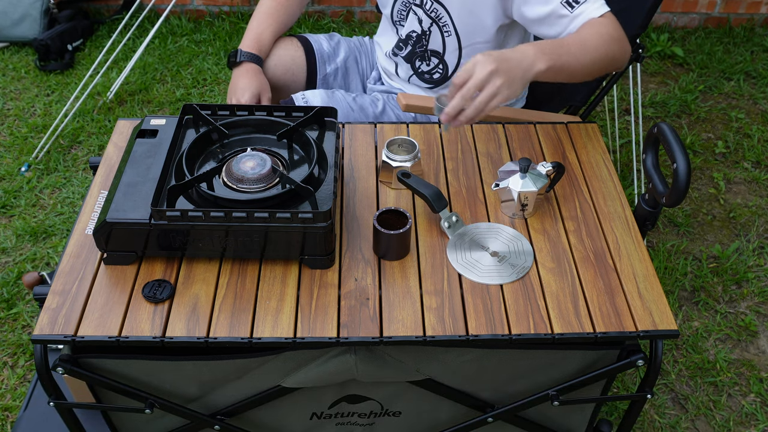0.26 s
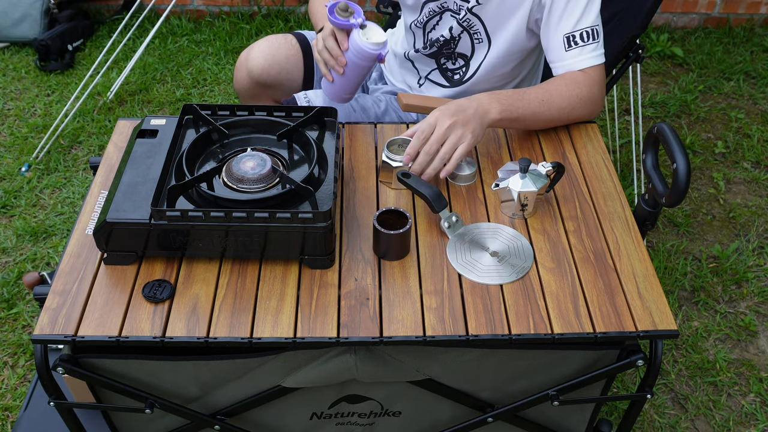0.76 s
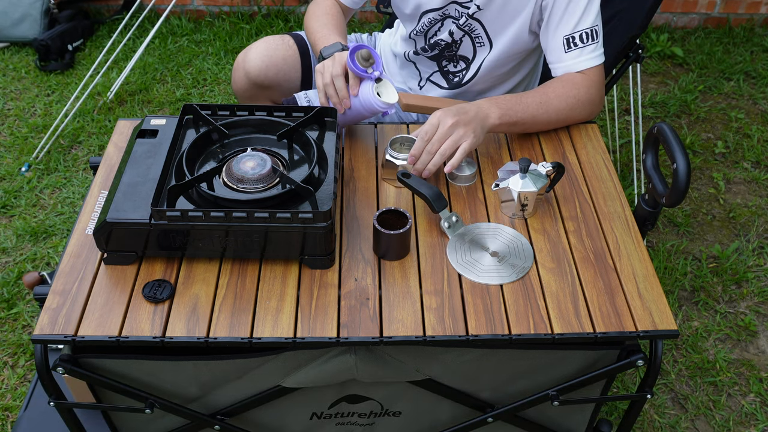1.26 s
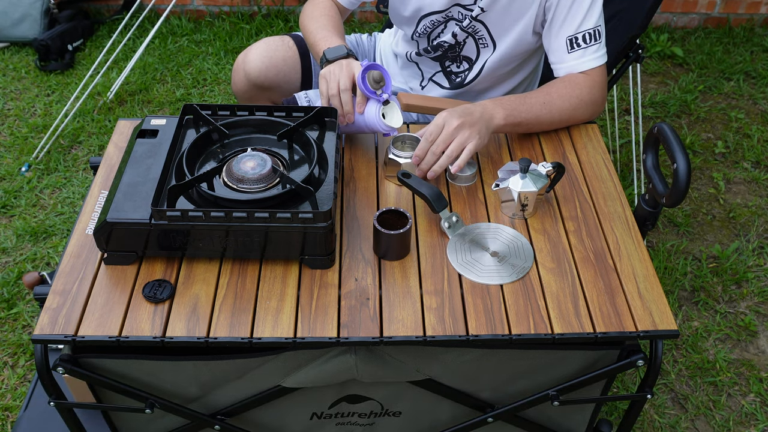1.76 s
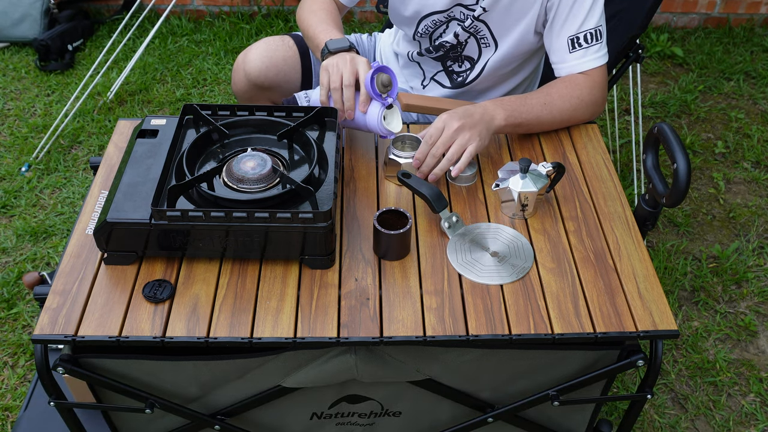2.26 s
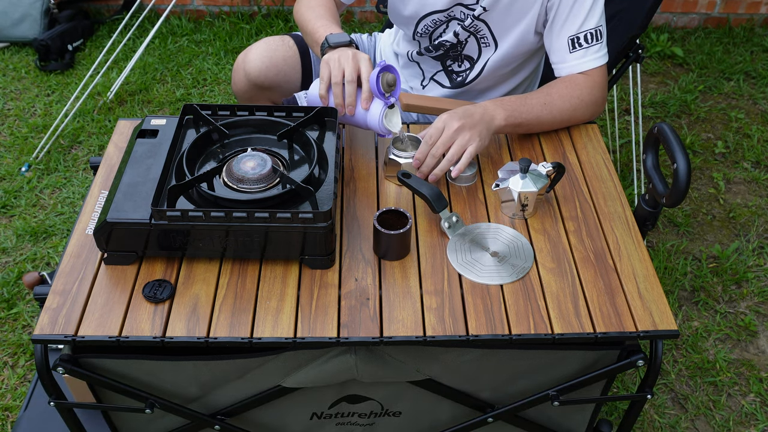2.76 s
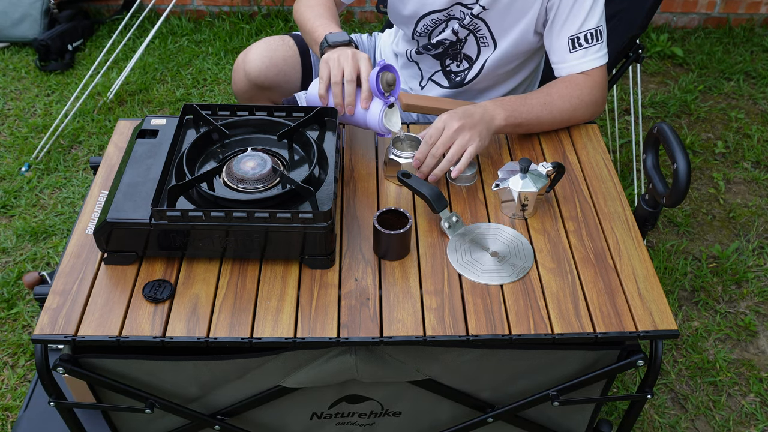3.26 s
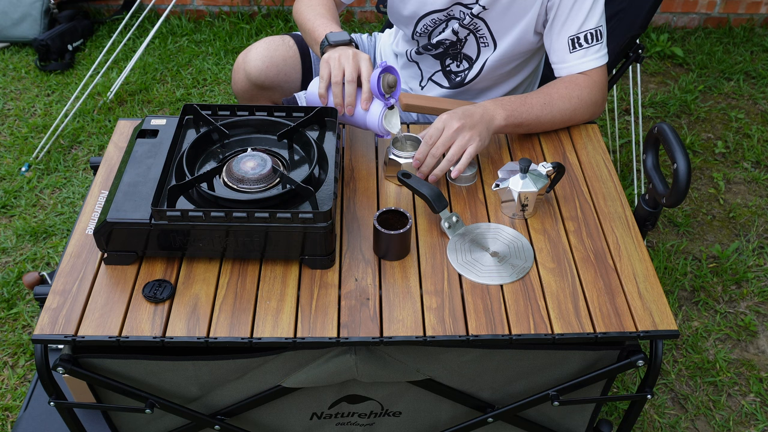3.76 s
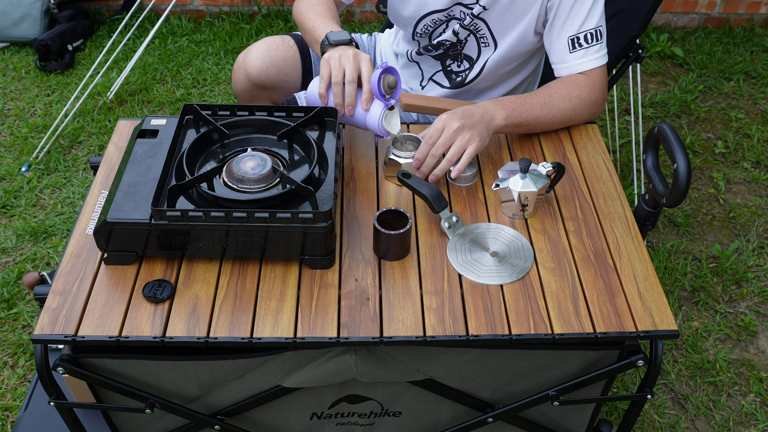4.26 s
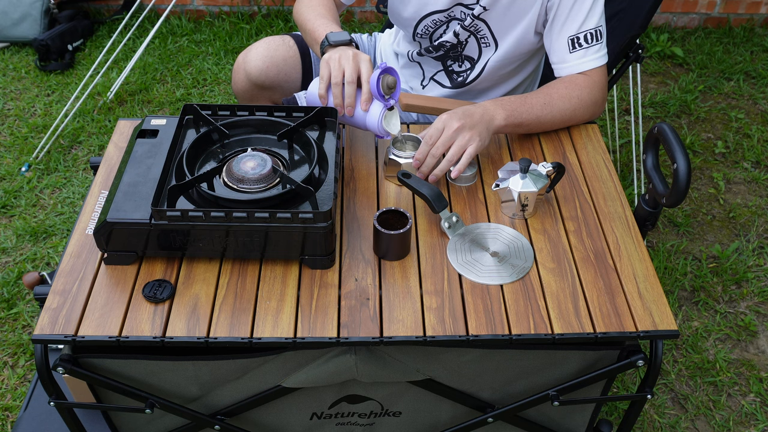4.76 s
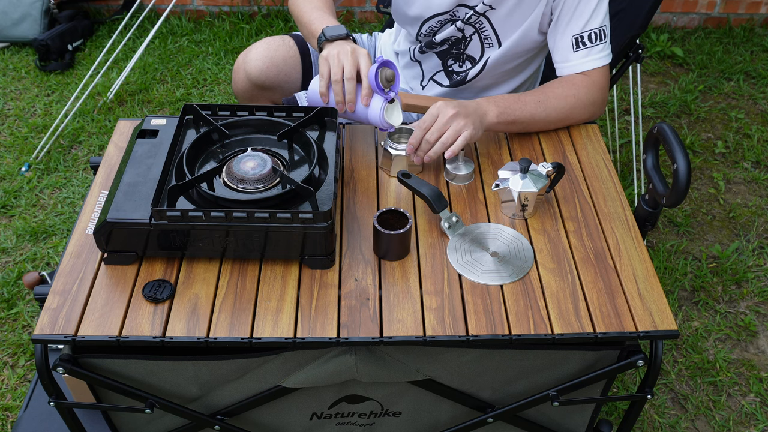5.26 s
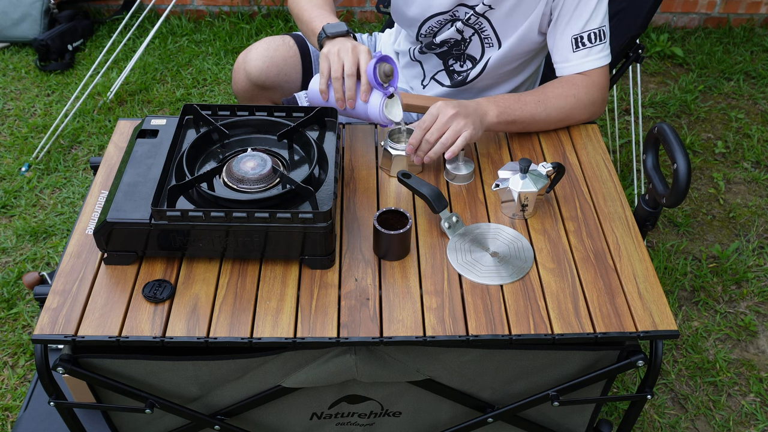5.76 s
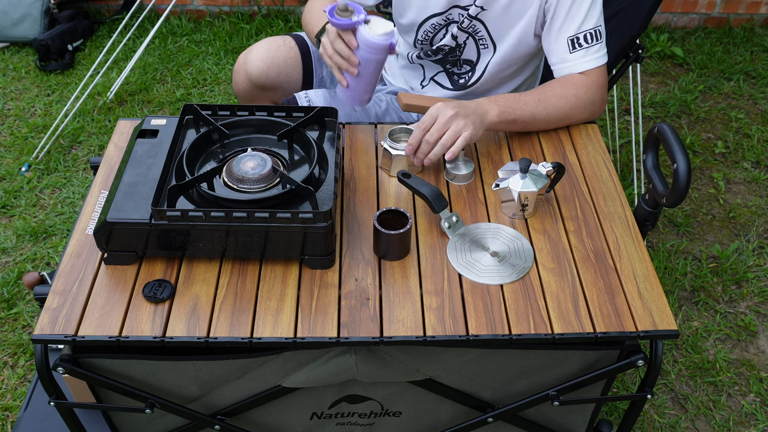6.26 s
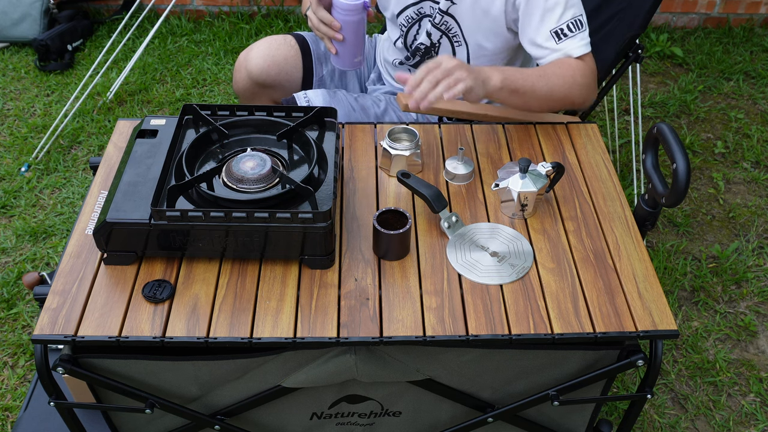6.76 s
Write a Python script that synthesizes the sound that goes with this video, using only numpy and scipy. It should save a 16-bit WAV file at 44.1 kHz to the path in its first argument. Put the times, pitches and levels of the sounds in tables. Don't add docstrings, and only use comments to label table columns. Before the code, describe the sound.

A metal coffee pot part clinks down and slides on a slatted wood table, then a bottle jolts and scrapes hollowly away. Small taps and rubs lead to one short cat mew, slightly left. Water follows in ticking drips and bubbling gulps, strongest midway, thinning out, then a short second splash and final faint handling. Pulsing cicadas, rustling leaves and far traffic surround it in wide stereo; the table is near and central.

```python
import sys
import numpy as np
from scipy import signal
from scipy.fft import rfft, irfft
from scipy.io import wavfile
from scipy.ndimage import uniform_filter1d

SR = 44100
rng = np.random.default_rng(int(sys.argv[2]) if len(sys.argv) > 2 else 0)


def persist_wave(psi):
    counts = np.round(np.clip(psi, -1, 1) * 32767).astype(np.int16)
    wavfile.write(sys.argv[1], SR, np.atleast_2d(counts).T)


def voltage_ratio(decibels):
    exponent = np.asarray(decibels, float) / 20
    return 10 ** exponent


N = 309134


def rms_one(x):
    return x / np.sqrt(np.mean(x ** 2) + 1e-20)


def in_time(rows, outside=None):
    s, *columns = np.transpose(rows)
    return [np.interp(np.arange(N) / SR, s, c, outside, outside) for c in columns]


def drift(rate):
    r = np.exp(-80 * np.pi * rate / SR)
    slow = signal.lfilter([1], [1, -2 * r, r * r], rng.standard_normal(N // 40 + 2002))[2000:]
    return np.interp(np.arange(N) / 40, np.arange(len(slow)), rms_one(slow))


def band(x, low_hz, high_hz, order=2):
    sos = signal.butter(order, [low_hz, high_hz], "band", fs=SR, output="sos")
    return signal.sosfilt(sos, x + 1e-18)


def resonate(x, hz, width):
    r = np.exp(-np.pi * width / SR)
    zeros = np.array([1, 0, -1]) * (1 - r * r) / 2
    return signal.lfilter(zeros, [1, -2 * r * np.cos(2 * np.pi * hz / SR), r * r], x)


def resonate_twice(x, hz, width):
    return resonate(resonate(x, hz, width), hz, width)


def place(x, pan_db):
    return x * voltage_ratio([[pan_db / 2], [-pan_db / 2]])


def add(out, s, sound):
    i = round(s * SR)
    out[i:i + len(sound)] += sound[:N - i]


def decay(t, t60):
    return voltage_ratio(-60 * t / t60)


def ping(hz, t60, rise=0., soft_s=0.000092):
    t = np.arange(int(1.2 * t60 * SR) + 40) / SR
    sine = np.sin(2 * np.pi * hz * t * (1 + rise * t / t60))
    return sine * decay(t, t60) * (1 - np.exp(-t / soft_s))


def grains(per_s, spread_db):
    sizes = voltage_ratio(spread_db * np.minimum(rng.exponential(1, N), 4)) * rng.choice([-1, 1], N)
    return sizes * (rng.random(N) < per_s / SR)


def lawn(x, echo_db):
    out, dull = np.zeros((2, N)), band(x, 200, 11000, order=1)
    lags = np.sort(rng.uniform(0.002993, .07, 14) * SR).astype(int)
    for k, lag in enumerate(lags):
        out[k % 2, lag:] += dull[:-lag] * voltage_ratio(echo_db - 250 * lag / SR) * (-1) ** (k // 2)
    return out


def gate(start, length, edge):
    end = start + length
    corners = [start - edge, start + edge, end - edge, end + edge]
    return np.sin(np.pi / 2 * np.interp(np.arange(N) / SR, corners, [0, 1, 1, 0])) ** 2


# [f/Hz, density/dB per Hz]
AIR_SPECTRUM = [(25, -30), (50, -6), (80, -4), (200, 0.5), (400, -8.5), (700, -15), (1500, -11.5),
                (3000, -16), (5400, -7.5), (6000, -8), (8400, -17), (9500, -27), (14000, -33.5),
                (15500, -31.5)]
# [f/Hz, width/Hz, level/dB]
DARK_SPOTS = [(3550, 300, -3.5), (5790, 430, -22), (8600, 350, -10)]
# [f/Hz, likeness 0-1]
LIKENESS = [(25, .99), (125, 0.95), (400, 0.77), (1000, 0.51), (3000, 0.51), (9000, 0.38), (15000, 0.044)]
# [t/s, relative level/dB]
BREEZE = [(0, 2.5), (.9, 1), (1.9, 1), (2.9, 1.5), (3.6, 1.1), (4.6, 3), (5.25, 0.5), (5.7, 4), (6.2, -0.5),
          (6.5, 0), (7.01, 2)]
# [f/Hz, rms level/dB]
HUM = [(120, -84), (240, -66.5)]


def air():
    hz = np.maximum(np.fft.rfftfreq(N, 1 / SR), 10)

    def read(rows):
        at, value = np.transpose(rows)
        return np.interp(np.log(hz), np.log(at), value)

    alike = read(LIKENESS)
    dips_db = sum(db * np.exp(-((hz - at) / w) ** 2) for at, w, db in DARK_SPOTS)
    mid, side = rfft(rng.standard_normal((2, N))) * voltage_ratio(read(AIR_SPECTRUM) + dips_db)
    mid, side = mid * np.sqrt(1 + alike), side * np.sqrt(1 - alike)
    noise = rms_one(irfft(np.array([mid + side, mid - side]), N)) * voltage_ratio(-56)
    rustle = band(noise, 570, 14400, order=1)
    noise = noise + rustle * (voltage_ratio(in_time(BREEZE)[0] + 0.45 * drift(6.8)) - 1)
    t = np.arange(N) / SR
    hum = sum(np.sqrt(2) * voltage_ratio(db + 2.2 * drift(0.63)) * np.sin(2 * np.pi * hz * t) for hz, db in HUM)
    return noise + hum


def cicada(pulse_hz, modes, depth, sharp, alike, pan_db, edges):
    phase = np.cumsum(pulse_hz * (1 + 0.025 * drift(8))) / SR
    burst = 1 - depth + depth * np.exp(-sharp * (phase % 1))
    mid, side = rng.standard_normal((2, N))
    direct = burst * mid * np.sqrt(1 + alike)
    scattered = np.roll(burst, 150) * side * np.sqrt(1 - alike)
    drive = direct + scattered * [[1], [-1]]
    body = 0
    for k, (hz, width, db) in enumerate(modes):
        body = body + voltage_ratio(db) * (-1) ** k * resonate_twice(drive, hz, 1.06 * width)
    return place(rms_one(band(body, *edges, order=5)), pan_db)


# [t/s, level/dB]
CHORUS = [(0, -56), (3.5, -56.5), (7.01, -55.5)]
# [f/Hz, width/Hz, level/dB]
CHORUS_MODES = [(6330, 1900, -9.5), (7276, 510, 4), (7770, 210, -11)]


def chorus():
    song = cicada(80.6, CHORUS_MODES, depth=0.66, sharp=3.2, alike=0.08, pan_db=-5.5, edges=(6200, 8250))
    return voltage_ratio(in_time(CHORUS)[0]) * song


THROB_HZ = 57.3
# [t/s, level/dB]
DRONE = [(0.0, -46), (1.31, -47), (2.46, -46), (4.55, -46.5), (5.04, -44.5), (5.9, -48.5), (7.01, -47)]
# [f/Hz, width/Hz, level/dB]
DRONE_MODES = [(4224, 500, -4.5), (4662, 437, 3), (5033, 326, 2), (5138, 644, -6.5)]


def drone():
    song = cicada(THROB_HZ, DRONE_MODES, depth=0.48, sharp=2.8, alike=0.63, pan_db=-3, edges=(3950, 5420))
    return voltage_ratio(in_time(DRONE)[0] + 0.5 + 1.3 * drift(5)) * song


# [first pull t/s, peak level/dB, length/s]
THROBS = [(0.05, -41, .11), (0.285, -42.5, 0.11), (0.5117, -39.5, 0.15), (0.7235, -41.5, .11),
          (0.9374, -41.5, 0.096), (1.1535, -41.5, 0.1), (1.364, -42, 0.11), (1.594, -41.5, 0.089),
          (1.8205, -42, 0.097), (2.0113, -42.5, 0.13), (2.229, -39, 0.12), (2.4365, -40, .11),
          (3.195, -57, 0.062), (3.472, -45, 0.21), (3.75, -42, 0.15), (4.005, -43, 0.12),
          (4.232, -42, 0.077), (4.4464, -42.5, .11), (4.657, -41, 0.12), (4.8705, -41.5, 0.13),
          (5.253, -40.5, 0.1), (5.4743, -40, .11), (5.694, -41, 0.12), (6.7458, -41.5, 0.19)]


def near_cicada():
    lead_s = .006
    t, starts = np.arange(N) / SR, np.transpose(THROBS)[0] - lead_s
    which = np.maximum(np.searchsorted(starts, t) - 1, 0)
    phase = np.abs(t - starts[which]) * THROB_HZ
    pull, count = phase % 1, phase.astype(int) + 128 * which
    chance = rng.standard_normal((count.max() + 1, 2))[count]
    sweep_hz = np.interp(pull, [0, .55], [5000, 3890]) * (1 + 0.022 * chance[:, 0])
    shape = np.interp(pull, [0, .15, .45, .7], [0.46, 0.36, 1, 0.1]) * voltage_ratio(1.3 * chance[:, 1])
    rough = 1 + 0.31 * rms_one(band(rng.standard_normal(N), 60, 360))
    song = rms_one(shape * rough * np.sin(2 * np.pi * np.cumsum(sweep_hz) / SR))
    song = band(song, 3760, 5400, order=4)
    song = song * sum(voltage_ratio(db - 6.5) * gate(s - lead_s, length, edge=0.01) for s, db, length in THROBS)
    return place(song, -3.5) + lawn(song, echo_db=-9.0)


# [t/s, f/Hz, level/dB, mouth shape 1-0: 1 pinched, 0.7 wide, 0.4 half open, 0 closing]
MEW = [
    (2.065, 436, -56, 1),
    (2.105, 450, -50, 1),
    (2.15, 453, -43.5, 0.87),
    (2.23, 462.6, -37.5, 0.71),
    (2.32, 466.7, -37, 0.63),
    (2.47, 452.5, -37, 0.42),
    (2.57, 439.8, -41.5, 0.3),
    (2.65, 399.5, -52, 0.09),
    (2.74, 348.5, -61, 0.02),
]
# [multiple, pinched level/dB, wide level/dB, half-open level/dB, closing level/dB]
MEW_MOUTHS = [(1, -24, -33, -31, 2.5), (2, -19, -32.5, -19.5, -12), (3, -16, -13, -13.5, -8),
              (4, -9, -4, -1, -4.5), (5, -12.5, -5, -11, -17), (6, -27, -20, -32, -31),
              (7, -9, -31, -21, -16), (8, -6, -10, -9.5, -18), (9, -2, -11, -21, -22),
              (10, -9, -21, -22, -34), (11, -22, -18, -17, -33), (12, -26, -15, -18.5, -42),
              (13, -25, -16, -39, -50)]


def mew():
    pitch_hz, _, mouth = in_time(MEW)
    level = voltage_ratio(in_time(MEW, -120)[1])
    steady_hz = uniform_filter1d(pitch_hz, size=1500)
    phase = 2 * np.pi * np.cumsum(steady_hz * (1 + 0.002 * drift(59))) / SR
    voice = 0
    for k, *mouths_db in MEW_MOUTHS:
        db = np.interp(mouth, [0, .4, .7, 1], mouths_db[::-1])
        wobble_db = 2.2 * np.sqrt(k / 4) * drift(14.0)
        voice = voice + voltage_ratio(db + wobble_db) * np.cos(round(k) * phase + rng.uniform(0, np.pi))
    low_breath = band(rng.standard_normal(N), 1750, 2340, order=3)
    high_breath = band(rng.standard_normal(N), 2740, 5200, order=4)
    breath = voltage_ratio(-15.5) * rms_one(low_breath + 0.66 * high_breath)
    return level * (1.35 * voice + breath)


# [start t/s, length/s, level/dB, centre f/Hz]
SLIDES = [(0, 0.061, -53, 534), (0, 0.012, -44, 1830), (.072, 0.11, -53, 1440), (.565, 0.038, -47, 950),
          (.583, 0.016, -42, 1290), (.64, 0.086, -44, 2310), (.684, 0.0051, -37.5, 4100),
          (.715, 0.052, -51, 1290), (1.108, 0.068, -51, 1570), (1.15, 0.077, -47.5, 1360),
          (1.1, 0.48, -57, 470), (1.2, 0.27, -52.5, 1160), (1.63, 0.14, -53, 1620),
          (1.75, 0.63, -61.5, 1420), (2.7, 0.16, -55, 1040), (4.05, 0.17, -54.5, 520),
          (3.225, 0.046, -61, 1060), (5.365, 0.067, -48.5, 367), (5.37, 0.16, -61.5, 2330),
          (5.368, .03, -58, 1500), (5.641, .006, -56, 1200), (.73, 0.18, -59, 730),
          (6.75, 0.15, -58, 328.6)]
# [start t/s, length/s, level/dB, centre f/Hz]
CHAFES = [(.43, 0.087, -60.5, 1940), (1.96, 0.19, -56, 3200), (1.165, 0.042, -48.5, 1420),
          (1.3, 0.026, -55, 1500), (1.245, 0.032, -49.5, 1050), (2.66, 0.093, -52, 1730),
          (5.38, 0.17, -57.5, 1120), (5.4, 0.18, -58.5, 500), (6.38, 0.14, -58.5, 2930),
          (6.66, 0.074, -53.5, 3120), (6.7, 0.2, -61.5, 2600)]
# [start t/s, length/s, level/dB, centre f/Hz]
RUSHES = [(3.45, 0.95, -74, 9300), (4.005, 0.025, -50.5, 420), (4.03, 0.1, -47, 1880),
          (4.07, 0.14, -38.5, 1540), (4.16, 0.2, -48.5, 2190), (4.2, 0.17, -48.5, 1590),
          (4.45, 0.062, -52, 3230), (4.48, 0.016, -55, 2390), (4.9, 0.17, -54.5, 1730),
          (4.95, 0.13, -57, 2240), (5.13, 0.074, -59, 1970)]
# [f/Hz, width/Hz, level/dB, length/s]
BUMP = [(520, 300, -45, 0.16), (830, 210, -47, 0.014), (1180, 630, -34, 0.056), (1870, 1400, -34.5, 0.037),
        (4540, 3700, -37.5, 0.021), (11000, 4000, -70, .018)]


def rubbing():
    out, slips = np.zeros(N), grains(4000, spread_db=3.0) * voltage_ratio(0.3 * drift(59))
    strokes = []
    for rows, share in [(SLIDES, 0.67), (CHAFES, 0.22), (RUSHES, 0.21)]:
        strokes += [(*row, share * row[3]) for row in rows]
    strokes += [(0.597, length, db, hz, width) for hz, width, db, length in BUMP]
    for k, (s, length, db, hz, width) in enumerate(strokes):
        i, n = int(s * SR), int(length * SR) + 500
        excitation = np.roll(slips, 997 * k)[i:i + n]
        stroke = rms_one(band(excitation, max(hz - width / 2, 100), hz + width / 2))
        swell = np.interp(np.arange(n), [0, 0.22 * n, 0.55 * n, n], [0.81, 1.0, 0.92, 0.18])
        add(out, s, voltage_ratio(db) * resonate(stroke, hz, 2.0 * width) * swell)
    return out


# [t/s, hollow level/dB, slats level/dB]
DRAG = [
    (.562, -62, -70),
    (.578, -52, -60),
    (.596, -49, -34),
    (.604, -28.5, -33),
    (.636, -36, -39),
    (.655, -28.5, -39),
    (.68, -33, -43),
    (.712, -38, -49),
    (.72, -58, -50),
]
# [f/Hz, width/Hz, level/dB]
SLATS = [(827, 84, -1), (1480, 55, 0), (1730, 90, -3), (2010, 61, 0), (2320, 51, -5)]


def drag():
    hollow_db, slats_db = in_time(DRAG, -150)
    slips = grains(3000, spread_db=3.0)
    hollow = rms_one(resonate_twice(slips, 1120, 1.5 * 67))
    slats = 0
    for k, (hz, width, db) in enumerate(SLATS, 1):
        slats = slats + voltage_ratio(db) * rms_one(resonate(np.roll(slips, 997 * k), hz, width))
    return voltage_ratio(hollow_db) * hollow + voltage_ratio(slats_db) * rms_one(slats)


# [t/s, peak level/dB, thud relative level/dB, main ring f/Hz]
KNOCKS = [(.006, -36.5, -8, 2100), (0.517, -45, 6.5, 1190), (.602, -22.5, -35, 1500),
          (.6855, -20.5, -19, 1637), (.686, -26.5, -32, 950), (0.768, -45, 8, 696), (1.179, -57, -20, 1480),
          (1.235, -34, 1, 1120), (1.355, -41, -5, 1670), (1.637, -42, -27, 1600), (1.678, -38, -31, 1770),
          (1.764, -42.5, -27, 1440), (1.861, -46.5, -17, 1320), (1.984, -46, -10, 1437),
          (2.738, -41, -22, 1120), (5.191, -43, -18, 1772), (5.37, -46, 6, 810), (5.533, -47, -10, 1650),
          (6.585, -43, -2, 1180)]
# [f/Hz, level/dB, t60/s]
POT = [(2530, -28, 3.8), (3040, -13, 0.59), (3934, 10, 0.16), (4015, 3.5, 0.43), (4900, -16, 1.3),
       (5030, -9, 0.09), (7250, -27, 0.47), (10000, -11.5, 0.26)]


def knocks():
    out, t = np.zeros(N), np.arange(int(.08 * SR)) / SR
    for s, db, thud_db, hz in KNOCKS:
        hiss = rng.standard_normal(len(t))
        add(out, s, voltage_ratio(db - 1.5) * ping(hz, 0.042, soft_s=0.00027))
        add(out, s, voltage_ratio(db - 8.0) * rms_one(band(hiss, 746, 1960, order=3)) * decay(t, 0.12))
        add(out, s, voltage_ratio(db + thud_db) * ping(233, 0.042, soft_s=0.001))
        add(out, s, voltage_ratio(db - 35) * rms_one(band(hiss, 3700, 6000)) * decay(t, 0.013))
    for hz, db, t60 in POT:
        add(out, 0, voltage_ratio(KNOCKS[0][1] + db - 7.5) * ping(hz, t60))
    return out


# [start t/s, length/s, level/dB, start f/Hz, end f/Hz]
WHISTLES = [(.003, 0.012, -49, 2080, 2030), (.003, 0.013, -43, 3200, 3260), (.003, 0.013, -45, 790, 790),
            (.044, 0.0084, -51, 2320, 2210), (1.369, 0.03, -61, 2450, 2450),
            (3.016, 0.026, -59, 3300, 3370), (3.117, 0.045, -64, 3080, 2430),
            (3.201, 0.073, -55.5, 1317, 963), (4.394, .022, -57, 2320, 2300),
            (4.699, .016, -51, 2680, 1900), (4.959, 0.016, -49, 2233, 2264),
            (4.981, 0.024, -49, 2390, 2150), (5.095, 0.028, -61, 2340, 2310),
            (5.14, 0.038, -49, 1750, 1855), (5.177, 0.02, -44, 2550, 2560), (5.468, .03, -63, 2400, 2400),
            (5.655, 0.028, -51, 1500, 1774), (5.79, 0.015, -60, 2000, 2000),
            (5.898, 0.038, -50, 1180, 1340), (5.97, 0.057, -47, 1054, 984)]


def whistles():
    out = np.zeros(N)
    for s, length, db, from_hz, to_hz in WHISTLES:
        way = np.linspace(0, 1, int(length * SR))
        waver = 1 + .45 * rms_one(band(rng.standard_normal(4000), 40, 250))[-len(way):]
        hz = to_hz + (from_hz - to_hz) * (1 - way) ** 1.375
        tone = np.sin(2 * np.pi * np.cumsum(hz) / SR)
        add(out, s, np.sqrt(2) * voltage_ratio(db) * np.sin(np.pi * way) ** .6 * waver * tone)
    return out


# [t/s, peak level/dB, lower band relative level/dB]
SPITS = [(2.9405, -50.5, -19), (3.0428, -57, -17), (3.075, -51, -19), (3.163, -51, -20),
         (3.2363, -47.5, 20), (3.5242, -65, -5), (3.5584, -58, -12), (3.62, -57, 6), (3.6339, -52.5, 14),
         (3.7807, -43, -19.5), (3.8604, -57, -7), (3.9901, -54, -17), (4.035, -59, -8), (4.7674, -59, -13),
         (4.8018, -60, -12), (4.882, -55, -17.5), (4.918, -51, -20), (5.178, -53, -10), (5.6593, -50.5, 1),
         (5.8853, -56, -2), (5.9123, -56, -2), (5.9402, -52, -15), (6.0589, -57, -10), (6.8162, -52, 4)]


def splashes():
    out, t = np.zeros(N), np.arange(int(.03 * SR)) / SR
    for s, db, lower_db in SPITS:
        hiss = rng.standard_normal(len(t))
        upper = rms_one(band(hiss, 8800, 13000, order=3))
        lower = rms_one(band(hiss, 5500, 5950, order=3))
        add(out, s, voltage_ratio(db - 3.5) * (upper + voltage_ratio(lower_db) * lower) * decay(t, 0.026))
    return out


# [t/s, level/dB]
STREAM = [
    [(2.9, -65), (3.45, -58), (3.89, -60), (4.05, -43.5), (4.21, -44), (4.42, -47.5), (4.81, -51.5),
     (5.2, -54)],
    [(5.37, -62), (5.54, -62), (5.946, -65), (6.1, -51)],
]


def stream():
    out = np.zeros(N)
    flow_db = np.max([in_time(rows, -150)[0] for rows in STREAM], axis=0)
    fizz_db = flow_db - 7.5
    for level_db, low_hz, high_hz in [(flow_db, 950, 1467), (fizz_db, 1600, 3670)]:
        born, dealt = grains(2500, spread_db=6.5), rng.integers(0, 8, N)
        rings = 0
        for k, hz in enumerate(np.geomspace(low_hz, high_hz, 8)):
            rings = rings + resonate_twice(born * (dealt == k) + 1e-18, hz, hz / 8)
        out += voltage_ratio(level_db - 7.0) * rms_one(rings)
    return out


# [t/s, peak level/dB, f/Hz]
DRIPS = [(3.265, -40, 3440), (3.5305, -42, 2340), (3.703, -44, 1850), (3.784, -37.5, 3500),
         (3.8071, -42, 3410), (3.8616, -40, 3540), (3.864, -49, 2350), (3.866, -51, 1900),
         (4.0355, -41, 2860), (4.2747, -36, 2340), (4.341, -36, 2260), (3.571, -45, 2610),
         (3.634, -38, 3470), (5.012, -48, 3370), (5.8636, -46, 2430), (5.886, -34.5, 2840),
         (5.94, -37, 2820), (5.988, -34.5, 3190), (6.059, -33, 2530), (6.586, -40, 3370)]
# [t/s, peak level/dB]
PLINKS = [
    (5.886, -39),
    (5.9255, -26),
    (5.941, -33),
    (5.987, -34),
]


def drips():
    neck_hz = 3900
    out, t = np.zeros(N), np.arange(int(.03 * SR)) / SR
    for s, db, hz in DRIPS:
        hiss = rng.standard_normal(len(t))
        add(out, s, voltage_ratio(db) * ping(hz, 76 / hz, rise=0.059, soft_s=0.0013))
        add(out, s, voltage_ratio(db - 9) * ping(neck_hz * (1 + 0.018 * hiss[0]), 0.035, soft_s=0.0006))
        add(out, s, voltage_ratio(db - 7.5) * rms_one(band(hiss, 2250, 5700, order=4)) * decay(t, 0.025))
    for s, db in PLINKS:
        add(out, s, voltage_ratio(db) * ping(neck_hz, .022, soft_s=.001))
    return out


# [t/s, peak level/dB, f/Hz]
GURGLES = [(3.266, -34, 1220), (3.832, -28, 1225), (3.864, -33, 1215), (3.882, -30.5, 1300),
           (3.897, -35, 1330), (3.912, -46, 1300), (3.956, -32, 1120), (3.968, -43, 1200),
           (3.987, -25.5, 1250), (4.005, -29, 1233), (4.029, -23, 1290), (4.039, -30, 1280),
           (4.052, -20.5, 1260), (4.082, -41, 1400), (4.101, -24.5, 1235), (4.159, -30.5, 1432),
           (4.204, -30.5, 1237), (4.228, -34, 1263), (4.269, -28, 1253), (4.343, -22.5, 1050),
           (4.318, -36, 1076), (4.403, -36, 1090), (4.42, -35, 1208), (4.456, -47, 1310),
           (4.475, -41.5, 1034), (4.512, -51, 1340), (4.554, -39, 1094), (4.573, -34, 1095),
           (4.606, -30.5, 1050), (4.627, -29.5, 1028), (4.658, -36, 1070), (4.7, -34.5, 1140),
           (4.73, -41, 1260), (4.744, -45, 1114), (4.753, -41, 1180), (4.768, -28.5, 1071),
           (4.799, -38.5, 1040), (4.828, -47, 1050), (4.882, -31, 1062), (4.997, -35, 968),
           (4.91, -40, 1060), (4.952, -44, 982), (5.656, -45, 1294), (5.832, -28, 1350), (5.862, -44, 1255),
           (5.885, -42, 1250), (5.941, -25.5, 1250), (5.947, -29, 1100), (5.958, -36, 1120),
           (5.987, -36, 1050), (6.059, -45, 1065)]


def gurgles():
    out, t = np.zeros(N), np.arange(int(.03 * SR)) / SR
    for s, db, hz in GURGLES:
        hiss = rng.standard_normal(len(t))
        t60 = 47.3 / hz
        add(out, s, voltage_ratio(db) * ping(hz, t60, rise=.03, soft_s=.0013))
        add(out, s, voltage_ratio(db - 14) * ping(hz * (1.2 + .05 * hiss[0]), .4 * t60, soft_s=.0015))
        add(out, s, voltage_ratio(db - 20) * rms_one(band(hiss, 1095, 1440, order=3)) * decay(t, 0.05))
    return out


def scene():
    background = air() + chorus() + drone() + near_cicada()
    cat = mew()
    handling = rubbing() + drag() + knocks() + whistles()
    water = splashes() + stream() + drips() + gurgles()
    table = handling + water
    cat_heard = place(cat, 4.5) + lawn(cat, echo_db=-21.0)
    table_heard = place(table, 0.053) + lawn(table, echo_db=-14.0)
    return background + cat_heard + table_heard


def roll_off(x):
    return signal.sosfilt(signal.butter(12, 15840, fs=SR, output="sos"), x)


def record(dry):
    return roll_off(dry)


dry = scene()
out = record(dry)
persist_wave(out)
```